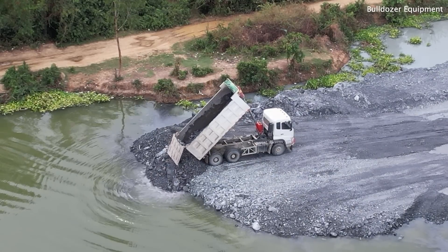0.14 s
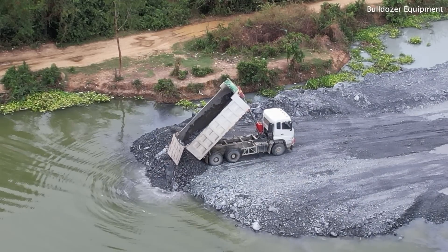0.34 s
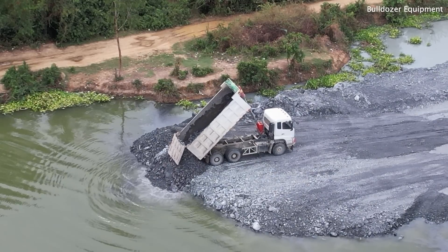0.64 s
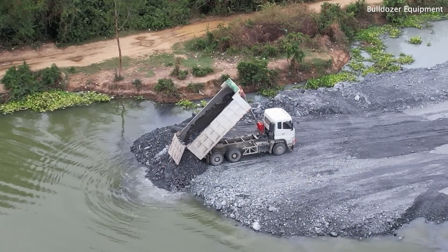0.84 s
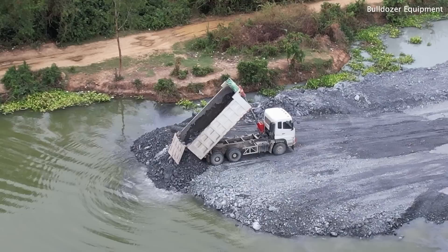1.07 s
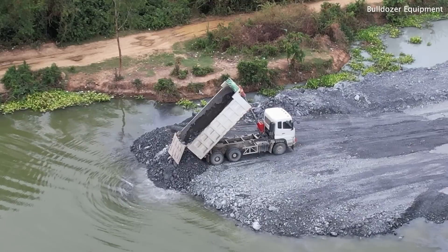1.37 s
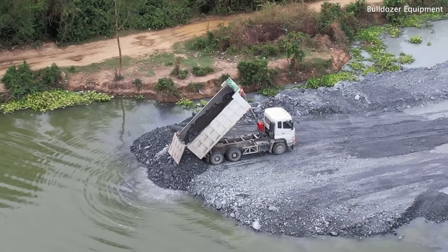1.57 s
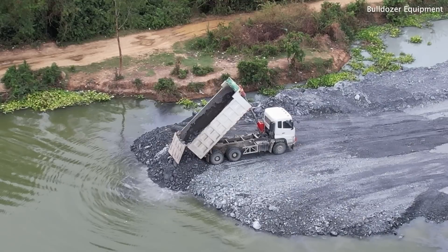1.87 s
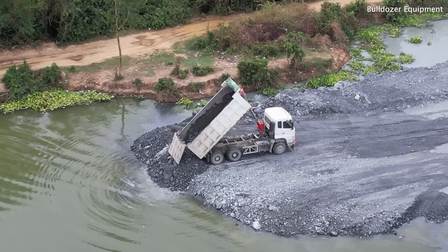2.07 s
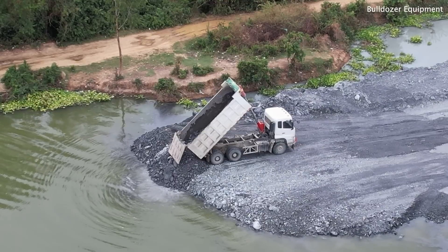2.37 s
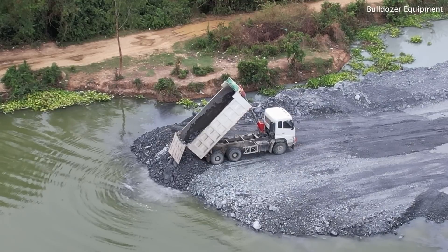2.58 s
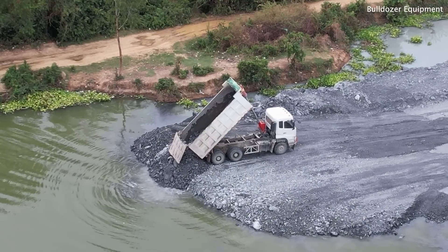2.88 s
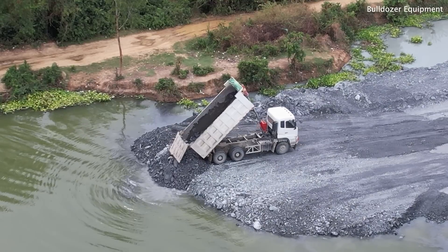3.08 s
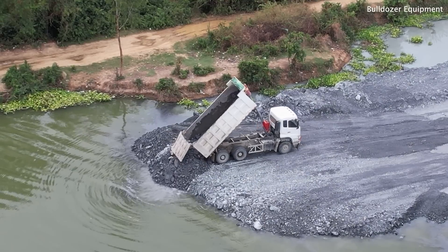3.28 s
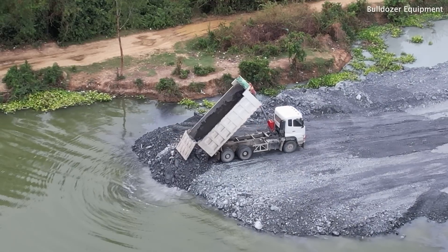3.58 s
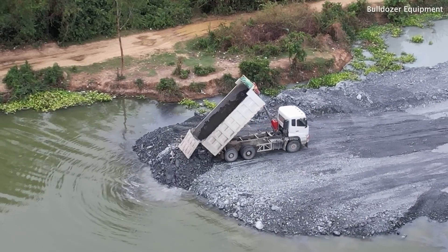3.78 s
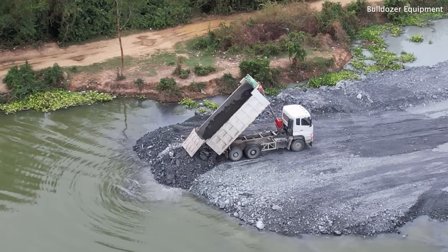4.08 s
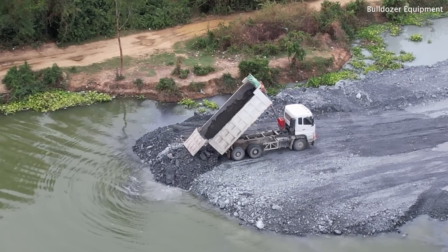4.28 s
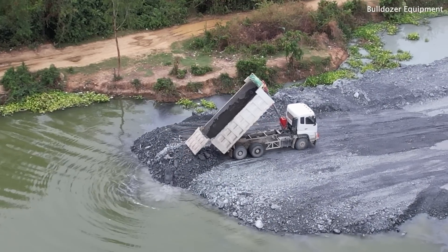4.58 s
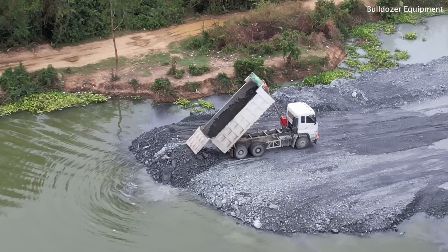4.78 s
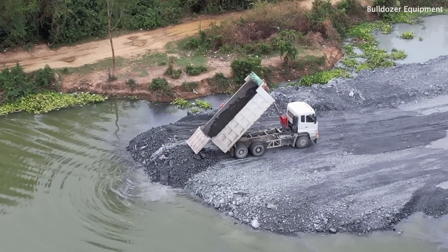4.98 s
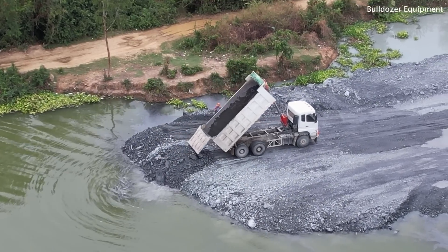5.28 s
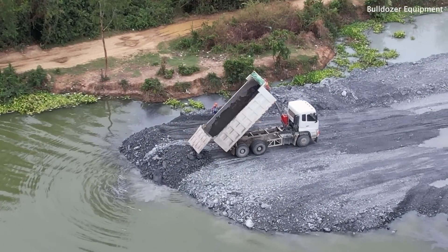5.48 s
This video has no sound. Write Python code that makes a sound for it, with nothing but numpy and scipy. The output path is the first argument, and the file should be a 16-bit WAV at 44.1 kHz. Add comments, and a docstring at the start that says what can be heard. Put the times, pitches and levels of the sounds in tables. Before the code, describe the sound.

A low diesel rumble starts with a faint turbo whistle falling away. A brief brake chirp precedes a loud steel slam, rattling stones and a hollow boom. More gate bangs follow near the middle and towards the end, with knocks, gravel clicks and a thin brake whine. Open yard, close stereo microphone with slightly dulled highs and wind buffeting.

```python
"""In a yard, a dump truck creeps forward with its bed raised, shaking out the last of a load of stones.
The steel tailgate slams three times and knocks in between: modes, dense ring and crack at each contact.
The bed booms in sagging tones; stones clank, scrape and click in short modes and shaped noise.
The diesel (engine orders plus noise) sags and picks up over a second, steady engine.
Brakes squeak as wavering tones, and wind thumps the microphone with falling sines."""
import sys
import numpy as np
from scipy import signal
from scipy.fft import rfft, irfft, next_fast_len
from scipy.io import wavfile

SR = 44100
rng = np.random.default_rng(int(sys.argv[2]) if len(sys.argv) > 2 else 0)


def to_wav(sig):
    """Store sig (one row per channel, or 1-D mono) as 16-bit WAV at the path in sys.argv[1].

    Samples outside -1..1 are clipped; the rate is SR.
    """
    pcm = np.clip(np.atleast_2d(sig), -1, 1) * 32767
    pcm = np.round(pcm).astype(np.int16)
    wavfile.write(sys.argv[1], SR, pcm.T)  # frames by channels


N = 248724
TIME = np.arange(N) / SR  # seconds

# Low rumble of engines and air. Each row: frequency in Hz, relative density in dB.
RUMBLE = [(15, -41), (30, -4), (50, 6.5), (90, 11), (150, -1.5), (210, -0.5), (255, -9), (310, -20),
          (450, -57.5)]
# First contact of hard bodies. Each row: frequency in Hz, relative density in dB.
CRACK = [(200, -23.5), (900, -27), (1500, 0), (2100, 3), (2700, -8.5), (7000, -14.5), (11000, -13),
         (16000, -38)]


def amp(db):
    """Decibels to gain."""
    return 10 ** (np.asarray(db) / 20)


def unit(x):
    """Scales to rms 1."""
    return x / np.sqrt(np.mean(x ** 2) + 1e-20)


def read(points, hz):
    """Interpolates a table on a log-frequency axis."""
    f, value = np.transpose(points)
    return np.interp(np.log(hz + 1), np.log(f + 1), value)


def curves(rows):
    """Interpolates each column of a timed table at every sample."""
    s, *columns = np.transpose(rows)
    return [np.interp(TIME, s, column) for column in columns]


def add(mix, s, sound):
    """Mixes a sound in at time s."""
    part = mix[max(round(s * SR), 0):][:len(sound)]
    part += sound[:len(part)]


def noise(spectrum, size):
    """Random-phase noise of rms 1 with a given spectrum."""
    hz = np.fft.rfftfreq(next_fast_len(size, True), 1 / SR)
    phases = np.exp(2j * np.pi * rng.random(len(hz)))
    return unit(irfft(amp(read(spectrum, hz)) * phases)[:size])


def drift(rate_hz):
    """Slow random wander of rms 1: sines from a tenth of rate_hz up to rate_hz."""
    t = TIME[::64]
    waves = 0
    for f in np.geomspace(rate_hz / 10, rate_hz, 20):
        waves = waves + np.sin(2 * np.pi * (f * t + rng.random())) / f ** 0.3
    return np.interp(TIME, t, unit(waves))


def die_away(x, t60, size=256):
    """Lets every band of x decay at its own speed."""
    hz, t, z = signal.stft(x, SR, nperseg=size)
    decay = amp(-60 * t / read(t60, hz)[:, None])
    return signal.istft(z * decay, SR, nperseg=size)[1][:len(x)]


def low_part(x, hz):
    """First-order low-pass at hz."""
    return signal.sosfilt(signal.butter(1, hz, fs=SR, output="sos"), x)


def tone(turns, db):
    """A sine of rms level db; turns is phase in cycles."""
    return np.sqrt(2) * amp(db) * np.sin(2 * np.pi * turns)


def ripple(x, bumps):
    """A hollow body stresses some pitches and swallows others (minimum-phase filter)."""
    size = next_fast_len(N, True)
    f = np.fft.rfftfreq(size, 1 / SR)
    ripple_db = sum(db * np.exp(-(2 * (f - hz) / width) ** 2) for hz, width, db in bumps)
    # minimum phase: it can only ring after it is struck
    mirrored_db = np.concatenate([ripple_db, ripple_db[1:(size + 1) // 2][::-1]])
    log_gain = np.log(amp(mirrored_db))
    response = np.exp(signal.hilbert(log_gain).conj()[:len(f)])
    return irfft(rfft(x, size) * response, size)[:N]


def whistle(rows, jitter, flutter_db, flutter_hz):
    """A tone wavering in pitch and level; rows hold s, Hz and one level column per harmonic."""
    hz, *levels = curves(rows)
    turns = np.cumsum(hz * (1 + jitter * drift(150))) / SR
    ramp_s = 0.0097
    sounding = np.clip(np.minimum(TIME - rows[0][0], rows[-1][0] - TIME) / ramp_s, 0, 1)
    harmonics = sum(tone(k * turns, db) for k, db in enumerate(levels, 1))
    return sounding * amp(flutter_db * drift(flutter_hz)) * harmonics


def breeze(db=-44.0, gust_db=2):
    """Light air rumbles on each microphone port separately, gusting on both together."""
    return np.array([noise(RUMBLE, N), noise(RUMBLE, N)]) * amp(db + gust_db * drift(3.0))


def wind(lowest_hz=62, fall=.75):
    """Each eddy gives a soft thump that drops in pitch, the faster the shorter it is."""
    # Each row: start in seconds, envelope peak in dB, starting pitch in Hz, time to peak in seconds.
    thump_rows = [(.508, -22, 380, .007), (.556, -25, 350, .006), (.648, -24, 360, .006),
                  (.714, -18, 300, .008), (.978, -15.5, 190, .008), (3.56, -15.5, 400, .0075),
                  (3.58, -25, 400, .005), (3.591, -13, 270, .011), (4.084, -13, 430, .006)]
    out, t = np.zeros(N), TIME[:SR // 10]
    for s, db, hz, peak_s in thump_rows:
        turns = np.cumsum(lowest_hz + (hz - lowest_hz) * np.exp(-t / (fall * peak_s))) / SR
        envelope = amp(db) * t / peak_s * np.exp(1 - t / peak_s)
        add(out, s, -envelope * np.sin(2 * np.pi * turns))
    return out


def engines(truck_db=-1, rumble_db=-34, clatter_db=-45, throb=0.054, knock=0.026, waver_db=2, surge_db=2.44):
    """Exhaust orders of two diesels; rumble throbs with the steady crank, clatter with the truck's firings."""
    # The truck slows, picks up and settles. Each row: time in seconds, firing rate in Hz, effort in dB.
    truck_curve = [(0, 70.7, -32.5), (.2, 70.87, -33.5), (.62, 57.5, -31.5), (.85, 54, -51),
                   (1.55, 50.5, -38.5), (2, 44.4, -36.5), (2.4, 43, -38), (2.85, 49.68, -24),
                   (3.2, 47.87, -29.5), (3.55, 42, -31.5), (3.82, 37.94, -53.5), (4.05, 39.24, -31),
                   (4.7, 41.52, -30.5), (5.64, 43.6, -32)]
    # Each row: multiple of the firing rate, relative level in dB.
    truck_orders = [(1, -0.5), (1.5, -12.5), (2, -9), (3, -12), (4, -31.5), (5, -29.5)]
    # Each row: multiple of the steady engine's crank rate, level in dB.
    idle_orders = [(4, -33.5), (5, -40.5), (6, -58), (7, -45.5), (8, -47), (9, -48), (10, -46.5), (13, -49)]
    # Each row: frequency in Hz, relative density in dB.
    clatter_spectrum = [(200, -35), (320, 5.5), (440, 13.5), (540, 8), (660, -0.5), (900, -3), (1170, -5.5),
                        (1500, -7), (2050, -4.5), (3000, -10.5), (4500, -18), (6000, -26), (7600, -27),
                        (11000, -32)]
    # Resonances and hollows of the clatter. Each row: centre in Hz, width in Hz, gain in dB.
    panel_bumps = [(738, 88, 5), (1010, 147, 6), (1134, 76, -7.5), (1380, 280, 6.5), (1960, 49, 6.5),
                   (2338, 210, -6.5), (2490, 470, 3), (2970, 92, -0.5), (3670, 1200, -3), (3940, 110, 6.5),
                   (4600, 89, 3.5)]
    idle_hz, cruise_db = 15.6, -31  # crank rate; effort at which noise levels are nominal
    rumble_follows, clatter_follows = 0.071, 0.14  # dB per dB of effort

    firing_hz, level_db = curves(truck_curve)
    effort_db = level_db - cruise_db
    firings = np.cumsum(firing_hz * (1 + 0.0047 * drift(22))) / SR
    crank = np.cumsum(idle_hz * (1 + 0.0032 * drift(5.4))) / SR

    truck = np.zeros(N)
    for k, db in truck_orders:
        order_waver_db = waver_db * drift(16) * np.log(k)  # higher orders waver more
        truck += tone(k * firings + rng.random(), level_db + truck_db + db + order_waver_db)
    idle = sum(tone(k * crank + rng.random(), db + 0.6 * drift(5.1)) for k, db in idle_orders)

    rumble = noise(RUMBLE, N) * amp(rumble_db + rumble_follows * effort_db + surge_db * drift(6))
    rumble *= 1 + throb * np.cos(2 * np.pi * crank)
    clatter = ripple(noise(clatter_spectrum, N), panel_bumps)
    clatter *= amp(clatter_db + clatter_follows * effort_db + 0.4 * drift(18))
    clatter *= 1 + knock * np.cos(2 * np.pi * firings)
    return truck + idle + rumble + clatter


def turbo():
    """The turbocharger winds down as a falling, fading whistle."""
    # Each row: time in seconds, pitch in Hz, level in dB.
    turbo_curve = [(0, 6400, -75), (.27, 6480, -72), (.36, 6380, -71), (.6, 6220, -76), (.8, 6080, -79),
                   (1.1, 5900, -86)]
    return whistle(turbo_curve, jitter=0.007, flutter_db=2, flutter_hz=60)


def brakes():
    """The shoes grab and slip on the drums: squeals swell, hold and fade as their pitch sags."""
    # Each row: start in seconds, length in seconds, mid pitch in Hz, level in dB, octave's level in dB.
    squeal_rows = [(0.972, .055, 1420, -56, -84), (5.16, 0.18, 2570, -53.5, -72),
                   (5.155, .17, 7965, -67, -110)]
    edge_db, sag_hz = -8.5, 7.6
    out = np.zeros(N)
    fade_db = edge_db * np.array([1, 0, 0, 1])
    u = np.linspace(0, 1, len(fade_db))
    for s, length, hz, db, octave_db in squeal_rows:
        rows = np.transpose([s + length * u, hz - sag_hz * (u - .5), db + fade_db, octave_db + fade_db])
        out += whistle(rows, jitter=0.001, flutter_db=1.5, flutter_hz=90)
    return out


def grab():
    """One brake shoe grabs and chatters just before the first slam."""
    # Each row: time in seconds, pitch in Hz, level in dB, octave's level in dB.
    grab_curve = [(.886, 2205, -56, -80), (.906, 2171, -44.5, -70), (.932, 2160, -39, -57),
                  (.945, 2138, -45, -64), (.952, 2080, -38.5, -65), (.96, 2170, -46, -68),
                  (.97, 2170, -51, -80), (.976, 2110, -43, -80), (.984, 2140, -49, -84),
                  (.994, 2160, -43, -80), (1.005, 2115, -49, -85), (1.03, 2140, -54, -90)]
    return whistle(grab_curve, jitter=0.003, flutter_db=1, flutter_hz=110)


def whine():
    """One dragging shoe whines on, swelling and fading."""
    # Each row: time in seconds, pitch in Hz, level in dB, octave's level in dB.
    whine_curve = [(4.84, 5117, -70, -80), (4.88, 5120, -65, -76), (4.95, 5130, -76, -82),
                   (5.0, 5130, -67, -72), (5.12, 5160, -66, -82), (5.2, 5160, -71, -80),
                   (5.3, 5145, -65, -77), (5.33, 5146, -57.5, -78), (5.395, 5155, -65, -88),
                   (5.445, 5148, -55.5, -90), (5.48, 5160, -65, -92), (5.66, 5154, -66, -95)]
    return whistle(whine_curve, jitter=0.001, flutter_db=2, flutter_hz=60)


def hinge():
    """The gate's hinge creaks as it swings: a rough tone of three harmonics."""
    # Each row: time in seconds, pitch in Hz, levels of harmonics 1, 2 and 3 in dB.
    hinge_curve = [(4.487, 2000, -58, -62, -72), (4.5, 2020, -51, -57, -66), (4.515, 2030, -53, -62, -71),
                   (4.528, 2020, -53, -54, -66), (4.537, 2040, -54, -66, -68), (4.555, 2030, -53, -62, -66)]
    return whistle(hinge_curve, jitter=0.028, flutter_db=2, flutter_hz=70)


def pebbles(width=0.027, skirt_db=-30, rise_s=0.0021, decay_s=0.0046):
    """Single pebbles ping on the heap: short bursts of narrow-band noise."""
    # Each row: start in seconds, level in dB, pitch in Hz.
    pebble_rows = [(3.383, -58, 7150), (4.122, -40, 2030), (4.126, -43, 3950), (4.145, -42, 3500),
                   (4.175, -53, 7200), (4.205, -47, 3530), (4.208, -55, 7200), (4.338, -53, 7100),
                   (4.917, -53, 7250), (4.962, -56, 7200), (5.024, -50, 7150), (5.079, -50, 7100),
                   (5.108, -51, 7100), (5.178, -49, 7150), (5.294, -55, 7200), (5.37, -57, 7100)]
    out, t = np.zeros(N), TIME[:SR // 10]
    envelope = (1 - np.exp(-t / rise_s)) * np.exp(-t / decay_s)
    for s, db, hz in pebble_rows:
        band = [(hz * (1 + width) ** k, skirt_db * (abs(k) > 1)) for k in (-5, -1, 1, 5)]
        add(out, s, amp(db) * noise(band, len(t)) * envelope)
    return out


def stones(per_s=900, spread_db=4.5, click_s=0.0027, trickle_db=-71, clump_db=4):
    """Small slides of stones trickle off the bed, each a shower of dry clicks."""
    # Each row: centre in seconds, level in dB, Gaussian spread in seconds.
    slide_rows = [(1.253, -33.5, .02), (1.76, -49, 0.031), (2.44, -44.5, 0.016), (2.6, -44, .01),
                  (2.956, -42, 0.039), (3.372, -53, 0.018), (3.46, -49, 0.013), (4.344, -47, 0.0097),
                  (4.682, -35.5, .018), (5.125, -38.5, 0.065)]
    # Each row: frequency in Hz, relative density in dB.
    stone_spectrum = [(500, -19), (1500, 10), (4000, 1), (7200, 1), (10000, -20.5), (14000, 16.5)]
    flow = sum(amp(db) * np.exp(-.5 * ((TIME - s) / spread_s) ** 2) for s, db, spread_s in slide_rows)
    flow = flow + amp(trickle_db + clump_db * drift(22))  # a little gravel never stops moving
    t, shower, kinds = TIME[:512], np.zeros(N), 10
    for _ in range(kinds):
        falls = rng.random(N) < per_s / kinds / SR
        sizes = amp(spread_db * np.minimum(rng.exponential(1, N), 4)) * falls
        click = noise(stone_spectrum, len(t)) * np.exp(-t / click_s)
        shower += signal.oaconvolve(sizes, click)[:N]
    return flow * unit(shower)


def scrapes(per_s=700, spread_db=3, ring_s=0.0056, rise_s=0.021):
    """Sliding gravel catches and lets go, each catch ticking the plate; a slide starts fast and runs out."""
    # Each row: start in seconds, level in dB, length in seconds.
    scrape_rows = [(1.711, -48.5, 0.085), (1.899, -45, 0.073), (4.12, -44.5, 0.19), (4.864, -41.5, 0.091)]
    # Each row: frequency in Hz, relative density in dB.
    scrape_spectrum = [(600, -33), (1000, 3.5), (1160, -7), (1360, 6.5), (1700, -14), (2100, -12.5),
                       (2400, -17.5), (3500, -22.5), (6000, -47)]
    flow = np.zeros(N)
    for s, db, length in scrape_rows:
        run_out = np.sqrt(np.clip(1 - (TIME - s) / length, 0, 1))
        flow += amp(db) * np.clip((TIME - s) / rise_s, 0, 1) * run_out
    sizes = amp(spread_db * np.minimum(rng.exponential(1, N), 3))
    catches = sizes * rng.choice([-1, 1], N) * (rng.random(N) < per_s / SR)
    t = TIME[:2048]
    plate = noise(scrape_spectrum, len(t)) * np.exp(-t / ring_s)
    return flow * unit(signal.oaconvolve(catches, plate)[:N])


def clanks(rise_s=0.001, tick_db=-13, tick_s=0.0021, tick_octave_db=14):
    """Large stones tick and ring a few close modes of the steel floor; deep clanks hardly tick."""
    # Each row: start in seconds, level in dB, pitch in Hz, decay in seconds.
    clank_rows = [(1.147, -17, 725, .007), (1.154, -18, 2614, .006), (1.159, -13.5, 1703, .006),
                  (1.181, -14, 959, 0.011), (1.185, -15, 1480, 0.0055), (1.203, -21.5, 1400, 0.0087),
                  (1.206, -23, 2700, 0.0062), (1.212, -20.5, 1920, 0.0058), (1.232, -23, 1046, .008),
                  (1.257, -23, 1010, 0.016), (1.345, -23.5, 441.5, 0.02), (1.877, -29, 483, 0.022),
                  (1.909, -27.5, 490, 0.016), (1.937, -42, 1380, 0.024), (2.846, -23.5, 1950, 0.0086),
                  (2.875, -23, 1320, 0.017), (2.897, -23, 1400, 0.014), (2.924, -28.5, 986, 0.017),
                  (2.951, -27.5, 1046, 0.017), (3.003, -28.5, 866, 0.01), (4.134, -36.5, 1010, 0.021),
                  (4.133, -24, 481, 0.016), (4.144, -39.5, 1350, 0.014), (4.187, -40, 1370, 0.015),
                  (4.205, -42.5, 1345, 0.0095), (4.239, -39, 1010, .012), (4.486, -30, 523, 0.01),
                  (4.498, -34, 1010, 0.012), (4.561, -13.5, 653, 0.0072), (4.597, -17.5, 507, 0.017),
                  (4.603, -19, 2080, 0.012), (4.634, -21.5, 1380, 0.015), (4.644, -23, 454, 0.0074),
                  (4.656, -17.5, 2120, 0.0065), (4.672, -29.5, 765, 0.0072), (4.677, -26, 1440, 0.0073),
                  (4.703, -25, 1060, .014), (4.808, -34, 1002, .014), (4.821, -25, 468, 0.0096)]
    # Each row: multiple of the pitch, relative level in dB.
    clank_modes = [(1, -4), (.91, -9), (1.12, -12), (1.55, -19)]
    out, t = np.zeros(N), TIME[:SR // 4]
    for s, db, hz, decay in clank_rows:
        ring = np.zeros(len(t))
        for k, mode_db in clank_modes:
            ring += tone(k * hz * t + rng.random(), mode_db) * np.exp(-t * k / decay)
        # the tick weakens per octave below 1 kHz
        pitch_tick_db = tick_db + tick_octave_db * min(np.log2(hz / 1000), 0)
        tick = amp(pitch_tick_db) * noise(CRACK, len(t)) * np.exp(-t / tick_s)
        add(out, s, amp(db) * (ring * (1 - np.exp(-t / rise_s)) + tick))
    return out


def booms(rise_s=0.0063, sag=0.097):
    """The jolted bed's floor flexes as a whole; its pitch sinks as the swing dies."""
    # Each row: start in seconds, level in dB, mid pitch in Hz, decay in seconds.
    boom_rows = [(1.143, -7, 186.7, 0.029), (1.221, -14.5, 132.4, 0.027), (1.261, -16.5, 155.5, 0.054),
                 (1.41, -18, 154.4, 0.018), (1.485, -23.5, 87.5, 0.023), (1.88, -22, 67.5, 0.06),
                 (1.899, -14, 108.8, 0.034), (2.84, -7, 165, 0.011), (2.992, -16, 152, 0.017),
                 (4.173, -22, 135.7, 0.043), (4.56, -9, 126, 0.013), (4.565, -17, 71, 0.068),
                 (4.598, -10.5, 178.5, 0.01), (4.638, -9.5, 122.7, 0.013), (4.689, -10, 180.5, 0.0088),
                 (4.9, -25, 114.5, 0.1)]
    # Each row: multiple of the pitch, relative level in dB.
    boom_modes = [(1, -0.5), (1.27, -9)]
    out, t = np.zeros(N), TIME[:SR]
    for s, db, hz, decay in boom_rows:
        swing = np.exp(-t / decay)
        turns = np.cumsum(hz * (1 + sag * (swing - .5))) / SR
        modes = sum(tone(k * turns, db + mode_db) for k, mode_db in boom_modes)
        add(out, s, (1 - np.exp(-t / rise_s)) * swing * modes)
    return out


def slam(s, db, bass_db, treble_db, near_crack_db, near_hz, near_db, far_db, far_crack_db, far_hz, far_note_db):
    """The contacts of one slam: the warped gate lands near side first, then far, in two steps each."""
    # Each row: delay in seconds, level in dB, bass in dB, treble in dB, rise in seconds, crack in dB.
    landing_steps = [(0, -1, -1.5, -1.5, .0013, 2), (.009, -4, 5, 5.5, .002, 1),
                     (.030, -2, -6.5, -4, .0022, 2.5), (.037, -5.5, -6.5, -8.5, 0.004, 1)]
    latch_hz, latch_db, frame_hz, frame_db = 1474, -5.5, 511.6, 13  # notes of the second and last step
    sides = [(0, near_crack_db, near_hz, near_db), (0, near_crack_db, latch_hz, latch_db),
             (far_db, far_crack_db, far_hz, far_note_db), (far_db, far_crack_db, frame_hz, frame_db)]
    for step, (side_db, side_crack_db, *note) in zip(landing_steps, sides):
        delay, step_db, bass, treble, rise, crack_db = step
        level_db = db + step_db + side_db
        yield s + delay, level_db, bass_db + bass, treble_db + treble, rise, crack_db + side_crack_db, *note


def rebound(s, db, gap, loss_db, treble_db, note_hz, note_db, count=3):
    """The contacts of a bouncing gate, ever sooner and weaker."""
    gap_ratio, bass_db, rise_s, crack_db = 0.81, 1.5, 0.0048, -10.5
    for k in range(count):
        yield s, db + k ** 2 * loss_db, bass_db, treble_db, rise_s, crack_db, note_hz, note_db
        s = s + gap * gap_ratio ** k


def soft_knock(s, db, first_db, bass_db, treble_db, rise):
    """The contacts of one knock: a hollow double tap, then the gate settles in two weaker ones. A slow rise
    softens the taps into a stone's scrape."""
    # Each row: delay in seconds, level in dB, treble in dB, hollow note in dB.
    tap_rows = [(0, -1, -3, 14), (.025, 0, 0, 12.5), (.06, -8.5, 2.5, 2.5), (.125, -8.5, -6.5, 2)]
    note_hz, crack_db = 494, -28
    for k, (delay, tap_db, treble, note_db) in enumerate(tap_rows):
        level_db = db + tap_db + first_db * (k == 0)
        yield s + delay, level_db, bass_db, treble_db + treble, rise, crack_db, note_hz, note_db


def contacts():
    """Every blow of gate on bed: (s, dB, bass dB, treble dB, rise s, crack dB, note Hz, note dB)."""
    # Each row: start in seconds, level, bass, treble in dB, near side's crack in dB, note in Hz, note in dB,
    # far side's level in dB, crack in dB, note in Hz, note in dB.
    slam_rows = [(1.139, -13.5, 1.5, 1, 0, 1835, -0.5, -2, -0.5, 1380, 1),
                 (2.8337, -20.5, -2.5, 1.5, 0.5, 2094, 9.5, 0, -2.5, 1348, 3.5),
                 (4.555, -16.5, 2.5, 3, 1.5, 568, 0.5, 1, -2.5, 1514, -0.5)]
    # Each row: start in seconds, level in dB, first gap in seconds, change at the next bounce in dB,
    # treble in dB, note in Hz, note in dB.
    rebound_rows = [(1.315, -33.5, .1, -6, -4, 459, 16), (2.92, -29, 0.04, -1.54, -3, 494, 6),
                    (4.632, -28, .031, -1, 7.5, 442, 1.5)]
    # Each row: start in seconds, level, first tap, bass, treble in dB, rise in seconds. The last row is a
    # bright stone scraping on the floor, not the gate.
    knock_rows = [(1.875, -38, -0.5, 13.5, -20.5, 0.0086), (4.11, -35.5, -5, 8, -24, 0.003),
                  (4.48, -30.5, -5, 13.5, -18, 0.0073), (4.872, -35.5, -5.5, 8, -11.5, 0.0031),
                  (5.15, -47, 1, -12, 10.5, 0.011)]
    kinds = [(slam, slam_rows), (rebound, rebound_rows), (soft_knock, knock_rows)]
    return [contact for kind, table in kinds for row in table for contact in kind(*row)]


def rattle(db=-13, per_s=750, hop_s=0.021, cycles=7, octave_db=-4, spread_db=3):
    """Each blow makes loose stones hop and clack on the steel floor."""
    jolt_power, clacks, t = np.zeros(N), np.zeros(N), TIME[:SR]
    for s, blow_db, _, treble_db, *_ in contacts():
        hop = amp(blow_db + treble_db) * t / hop_s * np.exp(1 - t / hop_s)
        add(jolt_power, s, hop ** 2)
    t, pitches = TIME[:2048], np.geomspace(850, 7000, 24)
    for hz in pitches:
        hits = rng.random(N) < per_s / len(pitches) / SR
        sizes = amp(spread_db * np.minimum(rng.exponential(1, N), 3)) * hits
        clack = tone(hz * t, octave_db * np.log2(hz)) * np.exp(-t * hz / cycles)
        clacks += signal.oaconvolve(sizes, clack)[:N]
    return amp(db) * np.sqrt(jolt_power) * unit(clacks)


def snaps(decay_s=0.00091):
    """Bare steel edges snap together in very short, bright ticks."""
    # Each row: start in seconds, level in dB.
    snap_rows = [(1.1391, -6), (4.586, -16)]
    # Each row: frequency in Hz, relative density in dB.
    snap_spectrum = [(3000, -31), (7000, -10.5), (10500, -9), (14000, -2.5), (17000, -7.5)]
    out, t = np.zeros(N), TIME[:SR // 20]
    for s, db in snap_rows:
        add(out, s, amp(db) * noise(snap_spectrum, len(t)) * np.exp(-t / decay_s))
    return out


def blow(modes, bass_db, treble_db, rise, crack_db, spot_hz, spot_db,
         dense_db=-1, crack_s=0.006, flex_s=0.00087, spot_s_at_1khz=0.0068, sag=0.055):
    """A crack at the contact, a short note from the struck spot, then dense ring and clear modes of the plates."""
    # Dense ring of the steel bed. Each row: frequency in Hz, relative density in dB.
    steel_spectrum = [(25, -34.5), (55, 7.5), (110, 11), (200, 7), (300, -9), (390, 5.5), (530, 2.5),
                      (660, -2.5), (1020, -7), (1170, -7), (1400, -4), (2100, -9), (2450, -5.5),
                      (7300, -21.5), (14000, -26.5)]
    # Each row: frequency in Hz, 60 dB decay in seconds.
    steel_t60 = [(60, 0.85), (180, 0.58), (500, 0.46), (1000, 0.28), (2000, 0.28), (5000, 0.17),
                 (12000, 0.2)]
    t = TIME[:len(modes)]
    ring = modes + amp(dense_db) * die_away(noise(steel_spectrum, len(t)), steel_t60)
    below_bass, below_treble = low_part(ring, 350), low_part(ring, 1500)
    # the whole plate takes a moment to start flexing
    bass = amp(bass_db) * (1 - np.exp(-t / flex_s)) * below_bass
    ring = bass + (below_treble - below_bass) + amp(treble_db) * (ring - below_treble)
    # the spot rings longer when it is low, and a little sharp while it is bent
    bend = np.exp(-t / (spot_s_at_1khz * (1000 / spot_hz) ** 0.29))
    ring = ring + bend * tone(np.cumsum(spot_hz * (1 + sag * (bend - .5))) / SR, spot_db)
    crack = amp(crack_db) * noise(CRACK, len(t)) * np.exp(-t / crack_s)
    return ring * (1 - np.exp(-t / rise)) + crack


def tailgate(modes_db=-10):
    """The gate swings shut and chatters against the bed; each contact starts the modes in random phases."""
    # Clear modes of gate and bed. Each row: frequency in Hz, relative level in dB, 60 dB decay in seconds.
    gate_modes = [(109.8, -8.5, 0.4), (157.2, 0, 1.1), (175.4, -10, 1.29), (197.4, 0.5, 0.32),
                  (239.6, -9, 0.98), (489.5, -5, 0.29), (519.4, -5, 0.41), (780, -19.5, 0.23),
                  (789, -13.5, 0.44), (945, -16.5, 0.14), (893, -16.5, 0.98), (1012, -13.5, 0.72),
                  (1046, -19, 0.2), (1240, -12.5, 0.43), (1400, -19.5, 0.21), (1462, -14, 0.23),
                  (1538, -7.5, 0.22), (1918, -5, 0.13), (2120, -9.5, 0.2), (2094, -13, 0.28),
                  (3185, -15.5, 0.2), (7860, -33.5, 0.2)]
    out, t = np.zeros(N), TIME[:SR]
    modes = np.array([np.sqrt(2) * amp(modes_db + db - 60 * t / t60) * np.exp(2j * np.pi * hz * t)
                      for hz, db, t60 in gate_modes])
    for s, db, *contact in contacts():
        phases = np.exp(2j * np.pi * rng.random(len(modes)))
        add(out, s, amp(db) * blow((phases @ modes).real, *contact))
    return out


def yard(x, build_s=0.025):
    """Scattered echoes from the banks and the heap: a decaying noise tail."""
    # Each row: frequency in Hz, 60 dB decay in seconds.
    yard_t60 = [(100, 1.77), (500, 1.1), (1500, 0.48), (4000, 0.7), (10000, 0.53)]
    tail = die_away(rng.standard_normal(SR), yard_t60) * (1 - np.exp(-TIME[:SR] / build_s))
    return signal.oaconvolve(x, tail / np.linalg.norm(tail))[:N]


def ports(x):
    """Two close microphone ports differ in level and phase, and catch different scatter."""
    # Each row: frequency in Hz, likeness of the two ports from 0 to 1.
    same_curve = [(200, .998), (350, .95), (520, .97), (800, .84), (1400, .86), (2200, .72), (5000, .55),
                  (7000, .68), (10000, .6)]
    # Each row: frequency in Hz, left-right level difference in dB.
    lean_curve = [(60, .6), (200, 1), (320, .8), (500, -6), (750, 0), (1050, -1), (1250, -2.8), (1700, -.8),
                  (2600, 2.5), (3500, 2), (4300, 0), (5600, .5), (7200, -1), (9000, 2)]
    # Each row: frequency in Hz, left-right phase difference in radians.
    lead_curve = [(100, -.2), (450, -.1), (750, .2), (1000, .65), (1600, -.1), (2800, .6), (3800, 0),
                  (4900, .7), (6000, 0), (7600, -.6), (8700, -2.8), (10000, -5.2), (11000, -6.5)]
    size = next_fast_len(N + SR // 10, True)
    hz, z = np.fft.rfftfreq(size, 1 / SR), rfft(x, size)
    scatter = rfft(rng.standard_normal(SR // 10) * np.exp(-TIME[:SR // 10] / .02), size)
    scatter = scatter / np.sqrt(np.mean(abs(scatter) ** 2))
    same = np.clip(read(same_curve, hz), 0, 1)
    side = np.sqrt((1 - same) / (1 + same)) * scatter
    lean = amp(read(lean_curve, hz) / 2) * np.exp(.5j * read(lead_curve, hz))
    return irfft(np.array([z * (1 + side) * lean, z * (1 - side) / lean]), size)[:, :N]


def scene(echo_db=-13.5):
    """The truck and its echoes, with the engines and the wind."""
    # Resonances and hollows of the open bed. Each row: centre in Hz, width in Hz, gain in dB.
    cavity_bumps = [(300, 87, -0.5), (346, 53, -3), (500, 90, -1.5), (649, 82, -4.5), (690, 22, 2.5),
                    (882, 59, -6), (1148, 81, -8), (1210, 60, 1), (1890, 130, -1), (2390, 380, -4)]
    bed = ripple(tailgate() + rattle(), cavity_bumps) + booms() + clanks() + scrapes()
    truck = bed + snaps() + hinge() + stones() + pebbles() + brakes() + grab() + whine() + turbo()
    return ports(truck + amp(echo_db) * yard(truck) + engines() + wind()) + breeze()


def record(dry):
    """Microphone colour, clipping at full scale and a low-pass band limit."""
    # Each row: frequency in Hz, gain in dB.
    mic_curve = [(7600, 0), (8200, -5.5), (8700, -10.5), (9300, -3), (11000, -11.5), (11900, -32),
                 (13300, -26), (15000, -34.5)]
    edge_hz = 14500
    size = next_fast_len(N + SR // 10, True)
    colour = amp(read(mic_curve, np.fft.rfftfreq(size, 1 / SR)))
    coloured = irfft(rfft(dry, size) * colour, size)[:, :N]
    edge = signal.firwin(255, edge_hz, window=("kaiser", 8), fs=SR)
    return signal.oaconvolve(np.clip(coloured, -1, 1), edge[None], "same")


dry = scene()
out = record(dry)
to_wav(out)
```